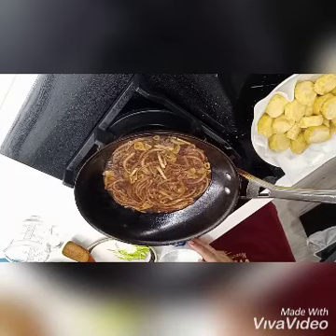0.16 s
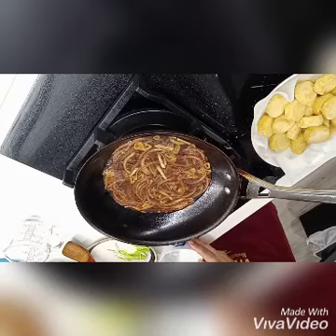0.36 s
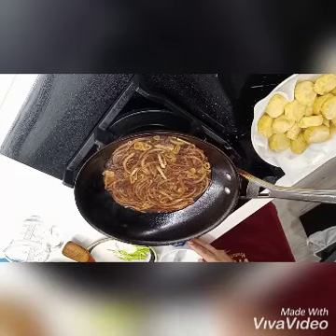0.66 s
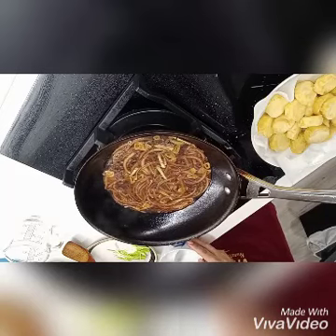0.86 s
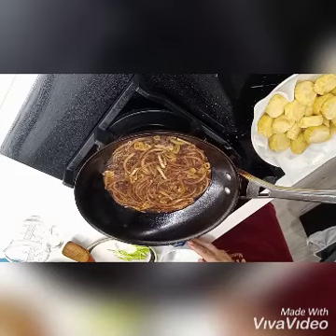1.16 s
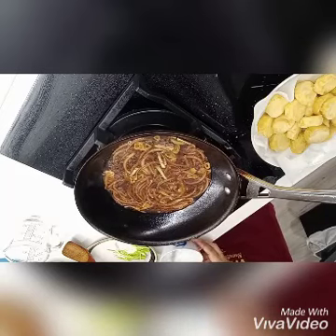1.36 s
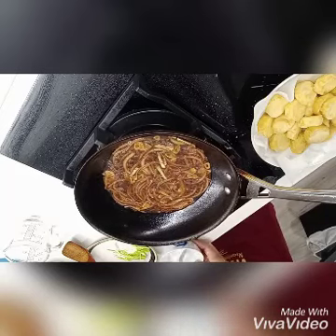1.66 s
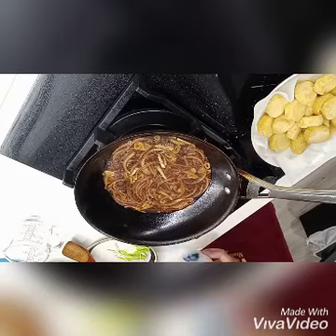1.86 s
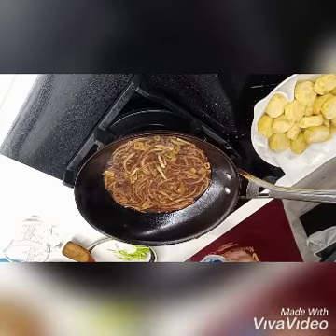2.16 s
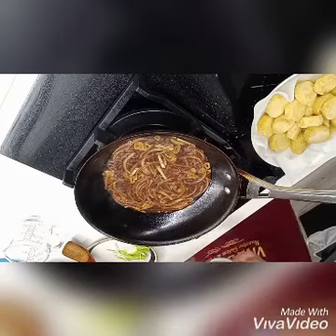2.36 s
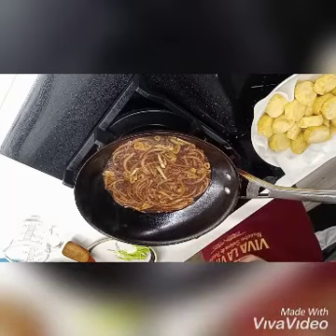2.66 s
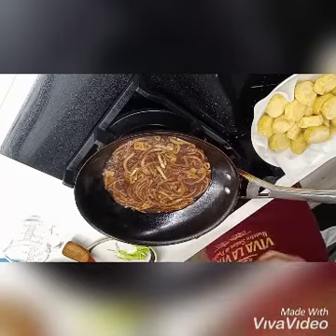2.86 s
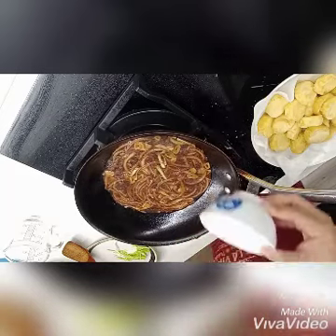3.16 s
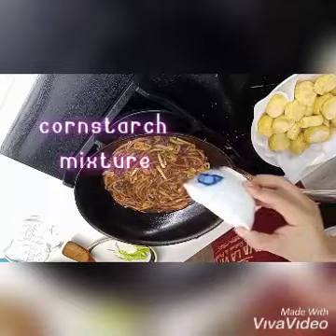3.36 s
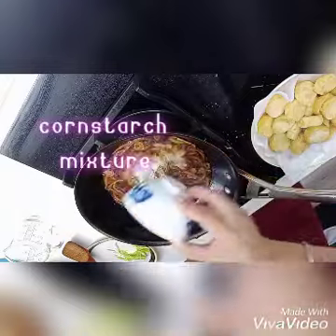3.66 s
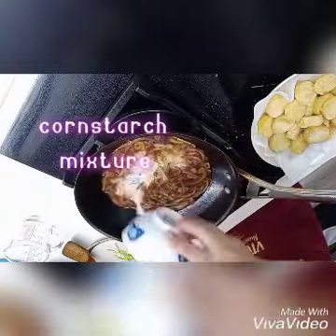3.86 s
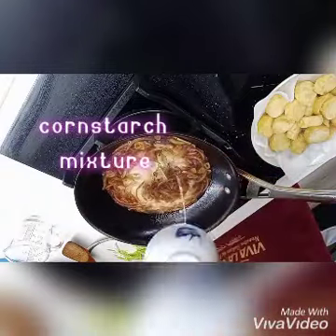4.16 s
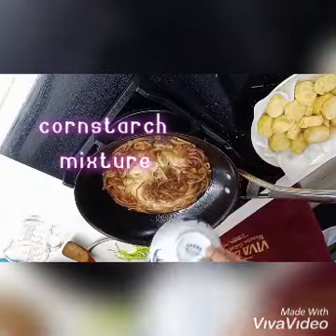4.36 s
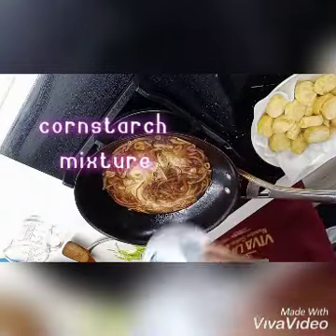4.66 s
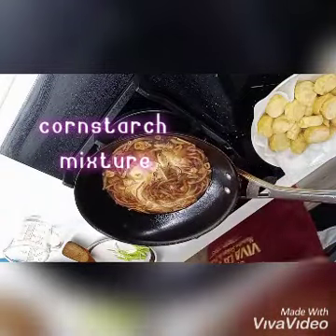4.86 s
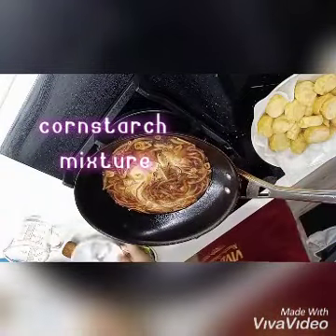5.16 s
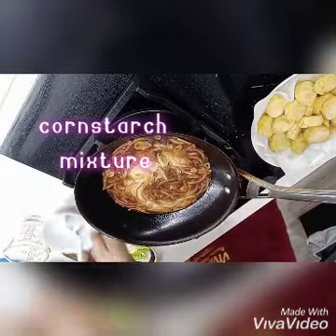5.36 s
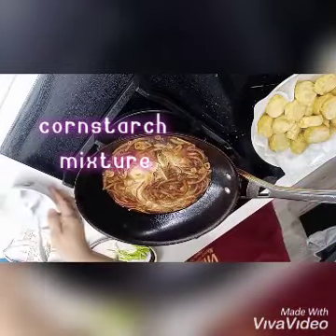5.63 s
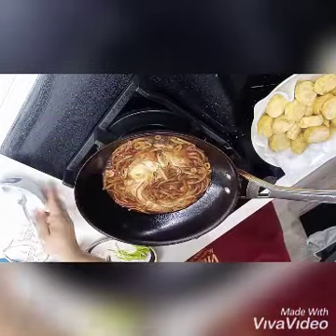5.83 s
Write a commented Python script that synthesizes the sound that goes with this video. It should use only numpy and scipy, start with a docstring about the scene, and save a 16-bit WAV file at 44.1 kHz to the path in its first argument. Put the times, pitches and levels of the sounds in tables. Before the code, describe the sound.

Steady stirring, about five turns a second, grinds and squeaks softly in a small bowl over quiet hum, hiss and fine sizzle. It stops, and a short, thin patter of liquid lands in sauce with tiny plips. The simmer fades. Later come hard, ringing spoon knocks, then a loud cluster of china chimes and counter thuds, with a short room reverberation and a close single microphone.

```python
"""A spoon rubs round a small china bowl of thin starch water, as random slips excite resonances, beside a
simmering pan of noise and pops, under low hum, airy hiss and a faint high whine of narrow-band noise.
Soft bubbles glide upward in pitch; then the liquid is tipped into the sauce as a patter of random droplets,
and the simmer sinks. Last the spoon clinks and the bowl clatters among the dishes on the counter of a small
kitchen: decaying modes, cracks and thuds, each with a short reverberant tail."""
import sys
import numpy as np
from scipy import signal
from scipy.fft import rfft, irfft, next_fast_len
from scipy.io import wavfile
from scipy.ndimage import uniform_filter1d, map_coordinates

SR = 44100
rng = np.random.default_rng(int(sys.argv[2]) if len(sys.argv) > 2 else 0)


def file_out(sig):
    """Save sig as 16-bit WAV at sys.argv[1]."""
    # one column per channel
    cols = np.atleast_2d(sig).T
    # limit, then scale
    lim = np.clip(cols, -1, 1)
    pcm = np.round(lim * 32767).astype(np.int16)
    wavfile.write(sys.argv[1], SR, pcm)


N = 264370  # length in samples

# Spectra of room hum and airy hiss, relative: frequency_hz, level_db
HUM_SPECTRUM = [(20, -17), (50, -19), (75, 3), (100, -2), (120, 4.5), (165, -3), (210, 0), (250, -14.5),
                (310, -7), (450, -15), (700, -15), (1000, -21.5), (1500, -52)]
AIR_SPECTRUM = [(500, -3), (900, -1.5), (1700, 6.5), (2300, 3.5), (3000, 3.5), (4400, -2), (5600, 1),
                (6300, -10.5), (7500, -6.5), (12000, -22)]
# Spectra of the simmer's fizz and of its bubble bursts, relative: frequency_hz, level_db
FIZZ_SPECTRUM = [(3000, -30), (5600, -25), (6350, -19), (6900, -1), (8000, -11.5), (8900, 5), (11000, 1.5),
                 (12500, -6.5), (13900, -1.5), (14700, -7), (15400, 6.5), (16000, -17)]
SPIT_SPECTRUM = [(4000, -11), (6000, -2.5), (10000, 4), (12000, 7), (14000, -20)]
# Centre of the whine: time_s, pitch_hz
WHINE_PITCH = [(0, 1293), (2.2, 1295), (3.4, 1310), (4.2, 1289), (4.8, 1281), (6, 1273)]
# Strength of the whine: time_s, level_db
WHINE_LEVEL = [(0, -53.4), (1.5, -53), (3.8, -54), (4.45, -62), (4.62, -59), (4.7, -51), (4.8, -58.5),
               (6, -60.5)]
# Mean levels; the cold liquid quenches the simmer, and the airy hiss sinks with it
HUM_DB, SIMMER_DB, AIR_DB = -57.5, -60, -62
QUENCH_AT_S, QUENCH_TIME_CONSTANT_S = 3.55, 0.97
SIMMER_QUENCH_DB, AIR_QUENCH_DB = -10.5, -2

# Reverberation of the kitchen: frequency_hz, t60_s
KITCHEN_DECAY = [(120, 0.65), (500, 0.25), (2000, 0.32), (6000, 0.29), (14000, 0.32)]

# Air pockets closing in the liquid, and last drips: start_s, initial pitch_hz, level_db
GLUGS = [(1.13, 927, -36), (1.166, 928, -44), (1.361, 870, -49), (1.539, 927, -44), (1.933, 2650, -40),
         (2.066, 2470, -43), (3.42, 2160, -46), (3.673, 1040, -52), (4.247, 3230, -39.5),
         (4.252, 3610, -45)]
# Gushes leaving the bowl: start_s, length_s, peak level_db
GUSHES = [(3.29, .26, -63.5), (3.856, 0.16, -67.5)]
# Spectrum of the stream on the sauce, relative: frequency_hz, level_db
SPLASH_SPECTRUM = [(60, -60), (300, -21), (1000, -24), (2200, 25), (3200, -27), (6000, 0), (12000, -24)]

# Resonances of the rubbed bowl and spoon, before the grip shifts them: centre_hz,
# width_hz of each of two cascaded filters, relative level_db
GRIND_RESONANCES = [(497, 125, -11.5), (1033, 184, -4), (1278, 180, 3), (1924, 146, -1), (2115, 200, 4.5),
                    (2880, 220, -17), (3413, 93, -4)]
SQUEAK_RESONANCES = [(2350, 110, -6), (4690, 100, 2), (6740, 170, -1), (8370, 200, -4), (9340, 200, -9),
                     (11290, 280, -9)]
# The rub sinks as the spoon slows: time_s, pitch_ratio
GRIP = [(0, 1.013), (1.1, 0.98), (1.55, 1.006), (1.7, .978), (2.2, 0.97)]
# Pressure on the bottom of the bowl: time_s, grind level_db
BOTTOM_PRESS = [(0, -55.5), (.2, -46), (.4, -48.5), (1.38, -47), (1.57, -48.5), (1.77, -59), (1.96, -47),
                (2.16, -51.5)]
# Pressure on the wall of the bowl: time_s, squeak level_db
WALL_PRESS = [(.1, -59.5), (1.07, -55), (1.46, -52.5), (1.66, -47.5), (1.85, -57), (2.05, -59.5)]
# The spoon digs in or slides for a moment: start_s, length_s, grind level_db
DIGS = [(0.208, 0.019, -40.5), (1.004, 0.017, -52), (1.967, 0.06, -48), (2.167, 0.023, -49),
        (2.197, 0.016, -40), (5.025, 0.031, -51), (5.134, 0.033, -51.5)]
# The spoon circles evenly: each turn grinds over the bottom, then squeaks along the wall
FIRST_TURN_S, TURN_S, STOP_S = .018, .192, 2.25
GRIND_S, SQUEAK_AFTER_S, SQUEAK_S = 0.0715, .072, 0.0803
SQUEAK_LAG_PER_S = 0.013  # the squeak comes a little later in each turn
SQUEAK_IN_GRIND_DB, GRIND_IN_SQUEAK_DB = -11.5, -3.5
PRESS_RISE_S, PRESS_FALL_S, DIG_RISE_S = 0.011, 0.0079, 0.0018

# Ringing modes of spoon, china and a dull knock near 1.26 kHz, before each contact scales their decay:
# pitch_hz, relative level_db, t60_s
SPOON_MODES = [(1868, -7, .22), (2830, -12, .12), (4124, -3, .3), (4160, -5, .24), (4215, -6, .26),
               (4478, -2, .13), (6950, -12, .2), (7090, -11, .16), (7187, -6, .22), (7268, 0, .17),
               (7335, -7, .18), (8371, -26, .19), (9432, -21, .23), (11030, -20, .2), (15450, -29, .15)]
CHINA_MODES = [(2247, -5, .25), (2385, -3.5, .68), (3095, -10, .13), (3848, -8, .22), (4490, -5, .2),
               (5437, 0, .2), (5777, -1, .35), (6564, -5, .17), (6777, 1, .14), (8420, -4, .15),
               (9442, -5, .29), (10256, -7, .14), (11400, -12, .18), (11520, -15, .16), (12580, -17, .13),
               (14650, -28, .25), (15080, -28, .2)]
KNOCK_MODES = [(1135, -19, 0.053), (1160, -18, 0.12), (1255.7, 3, 0.15), (1312, 3.5, 0.12)]
# Spectrum of the contact noise, relative: frequency_hz, level_db
CRACK_SPECTRUM = [(40, -58), (200, -20.5), (800, -17.5), (1300, 2), (1900, 5.5), (2800, 1.5), (3500, -0.5),
                  (4300, 1), (5500, -4), (6300, -8), (7200, -12.5), (8200, -20.5), (11500, -26.5),
                  (13500, -53), (15500, -45)]
# Resonances of the counter: centre_hz, width_hz of each of two cascaded filters, relative level_db
COUNTER_RESONANCES = [(126, 18.4, 3), (175.3, 77, 3), (297, 116, -0.5), (479, 110, 2), (693, 87, 0.5),
                      (950, 170, -2)]
# Spoon on bowl: start_s, crack_db, low_ring_db, high_ring_db, sustain (factor on t60)
CLINKS = [(0.5433, -32, -27, -36, 0.15), (4.247, -49, -57, -60, 0.3), (4.8629, -23, -25.5, -18.5, 0.5),
          (4.8935, -25, -25, -26.5, 0.73), (5.012, -48, -45, -55, 0.55), (5.04, -41, -46, -48.5, 0.38),
          (5.1397, -52.5, -58.5, -60, 0.85), (5.1916, -52, -59.5, -59.5, .75),
          (5.59, -21.5, -27, -18, 0.65), (5.6991, -22, -30, -21, 0.62), (5.7214, -20, -36, -25.5, 1)]
# Bowl on other china: start_s, crack_db, ring_db, brightness_hz, sustain (factor on t60)
CHIMES = [(5.5813, -18, -18, 12000, 0.87), (5.601, -28, -25, 11000, 1), (5.6209, -35, -18.5, 9000, 1),
          (5.6448, -28, -25, 10100, 0.64), (5.7223, -33, -26.5, 10000, .9)]
# Foot of the bowl on the counter: start_s, knock_db, crack_db, thud_db, rattle_s
BUMPS = [(0.549, -32, -40, -34, 0.054), (5.4936, -58, -21, -23.5, .005), (5.5177, -24.5, -36, -22.5, .005),
         (5.559, -48, -29.5, -32, .005), (5.582, -24.5, -29, -25, 0.041),
         (5.6883, -19.5, -24.5, -23, 0.022), (5.7088, -18.5, -30.5, -28, 0.069),
         (5.7552, -24, -33, -32, 0.0055), (5.7712, -14, -22, -25, 0.041), (5.8112, -35, -37, -38, .005)]
REBOUND_S, REBOUND_DB = .0072, -9  # the spoon bounces once
CLINK_KNOCK_DB = -5.5  # beside the low ring
KNOCK_SUSTAIN = 0.51  # factor on t60
CRACK_T60_S, THUD_T60_S, THUD_RISE_S = 0.042, 0.071, 0.0037
# First gap, ratio of each gap to the one before, loss over the rattle's length
RATTLE_GAP_S, RATTLE_SLOWS, RATTLE_LOSS_DB = .009, 1.25, 19.5

TOP_HZ = 15700  # band limit of the microphone


def amp(db):
    """Logarithmic level: decibels to linear gain."""
    return 10 ** (np.asarray(db) / 20)


def unit(x):
    """Normalisation: scale to rms 1."""
    return x / np.sqrt(np.mean(x ** 2) + 1e-20)


def along(points, hz):
    """Logarithmic frequency scale: read (frequency, value) points at hz."""
    f, v = np.transpose(points)
    return np.interp(np.log(hz + 1), np.log(f + 1), v)


def curve(rows):
    """Linear interpolation: (time, value) rows to one value per sample."""
    s, value = np.transpose(rows)
    return np.interp(np.arange(N) / SR, s, value)


def wobble(rate):
    """Slow random modulation: a smooth curve through rate random knots a second."""
    knots = rng.standard_normal(int(N * rate / SR) + 4)
    return map_coordinates(knots, [np.arange(N) * rate / SR])


def filtered(x, response):
    """Linear filtering: multiply the transform of x by a response of frequency."""
    m = next_fast_len(len(x) + 4096)
    return irfft(rfft(x, m) * response(np.fft.rfftfreq(m, 1 / SR)), m)[:len(x)]


def coloured(x, spectrum):
    """Spectral shaping: weight x by a spectrum, at rms 1."""
    return unit(filtered(x, lambda hz: amp(along(spectrum, hz))))


def resonate(x, modes, ratio=1):
    """Resonance: sum squared band-pass responses, whose skirts are steep, at rms 1."""
    def response(f):
        total = 0
        for centre, width, db in modes:
            band = 1j * f * width / ((centre * ratio) ** 2 - f * f + 1j * f * width)
            total = total + amp(db) * band ** 2
        return total
    return unit(filtered(x, response))


def grains(size, rate, spread_db):
    """Random excitation: impulses of uneven strength and sign, about rate a second, at rms 1."""
    hit = rng.random(size) < rate / SR
    sign = np.sign(rng.standard_normal(size))
    strength = amp(spread_db * np.clip(rng.standard_normal(size), -2, 2))
    return unit(hit * sign * strength)


def ring(modes, t, sustain, scatter_db):
    """Modal decay: struck modes of random strength and phase start near rms 1, damped by hand or counter."""
    hz, db, t60 = np.transpose(modes)[:, :, None]
    hz = hz * (1 + .0006 * rng.standard_normal(hz.shape))
    gain = amp(db + scatter_db * rng.standard_normal(db.shape))
    decay = amp(-60 * t / (t60 * sustain))
    waves = np.sin(2 * np.pi * (hz * t + rng.random(hz.shape))) * decay
    onset = 1 - np.exp(-t / .0005)
    return (gain * waves).sum(0) * np.sqrt(2 / np.sum(gain ** 2)) * onset


def add(track, s, sound):
    """Superposition: mix a sound into a track at s seconds."""
    part = track[max(round(s * SR), 0):][:len(sound)]
    part += sound[:len(part)]


def in_kitchen(x, wet_db):
    """Reverberation: add x convolved with decaying noise, whose decay time depends on frequency."""
    hz, t, z = signal.stft(rng.standard_normal(SR // 2), SR, nperseg=256)
    decay = amp(-60 * t / along(KITCHEN_DECAY, hz)[:, None])
    tail = signal.istft(z * decay, SR, nperseg=256)[1]
    tail *= 1 - np.exp(-np.arange(len(tail)) / SR / 0.0024)
    return x + amp(wet_db) * signal.fftconvolve(x, tail / np.linalg.norm(tail))[:len(x)]


def quench():
    """Exponential approach: cooling grows from 0 toward 1 once the cold liquid is in."""
    elapsed = np.maximum(np.arange(N) / SR - QUENCH_AT_S, 0)
    return 1 - np.exp(-elapsed / QUENCH_TIME_CONSTANT_S)


def room_hum():
    """Coloured noise: a low hum whose level wavers at random."""
    return amp(HUM_DB + 1.3 * wobble(7)) * coloured(rng.standard_normal(N), HUM_SPECTRUM)


def patchy(x, depth_db):
    """Time-frequency modulation: smoothed random patches of gain on x."""
    z = signal.stft(x, nperseg=256)[2]
    field = uniform_filter1d(rng.standard_normal(z.shape), size=4, axis=0)
    field = uniform_filter1d(field, size=7, axis=1)
    return signal.istft(z * amp(depth_db * unit(field)), nperseg=256)[1][:len(x)]


def airy_hiss():
    """Coloured noise: patchy hiss that sinks with the quenched simmer."""
    level_db = AIR_DB + AIR_QUENCH_DB * quench() + 0.52 * wobble(3.3)
    return amp(level_db) * coloured(patchy(rng.standard_normal(N), depth_db=3.0), AIR_SPECTRUM)


def high_whine():
    """Quadrature modulation: two low-passed noises on a gliding carrier make a fuzzy tone."""
    def narrow():
        return filtered(rng.standard_normal(N), lambda hz: 1 / (1 + 1j * hz / 34) / (1 + 1j * hz / 180))
    phase = 2 * np.pi * np.cumsum(curve(WHINE_PITCH)) / SR
    tone = unit(narrow() * np.cos(phase) + narrow() * np.sin(phase))
    return amp(curve(WHINE_LEVEL)) * tone


def spits(rate, centre_hz, life):
    """Bubble bursts: puffs of resonant noise at random times, each at its own pitch, at rms 1."""
    out, t = np.zeros(N), np.arange(SR // 20) / SR
    count = int(rate * N / SR)
    times = rng.random(count) * N / SR
    variations = np.clip(rng.standard_normal((count, 2)), -1.8, 1.8)
    for s, (pitch, size) in zip(times, variations):
        hz = centre_hz * np.exp(.22 * pitch)
        puff = resonate(rng.standard_normal(len(t)), [(hz, 0.15 * hz, 0)])
        envelope = amp(3.5 * size - 60 * t / life) * (1 - np.exp(-t / .003))
        add(out, s, envelope * puff)
    return unit(out)


def simmering():
    """Bubble noise: fine fizz and sauce bubbles bursting, quenched by the cold liquid."""
    pops = grains(N, rate=900, spread_db=5)
    fizz = coloured(rng.standard_normal(N) + 1.07 * pops, FIZZ_SPECTRUM)
    bursts = coloured(spits(rate=150, centre_hz=8560, life=0.02), SPIT_SPECTRUM)
    level_db = SIMMER_DB + SIMMER_QUENCH_DB * quench() + 1.45 * wobble(7)
    return amp(level_db) * (fizz + amp(-2.5) * bursts)


def bubbles():
    """Bubble resonance: decaying sines rise in pitch, and those of higher pitch die sooner."""
    out, t = np.zeros(N), np.arange(SR // 6) / SR
    for s, hz, db in GLUGS:
        life = 130 / hz
        envelope = amp(db - 60 * t / life) * (1 - np.exp(-20 * t / life))
        add(out, s, envelope * np.sin(2 * np.pi * hz * t * (1 + 0.041 * t / life)))
    return out


def pouring():
    """Random impacts: droplets of the thin stream patter on the sauce in gushes."""
    flow = np.zeros(N)
    for s, length, db in GUSHES:
        add(flow, s, amp(db) * np.hanning(int(length * SR)))
    return flow * coloured(grains(N, rate=900, spread_db=3), SPLASH_SPECTRUM)


def stroke(s, length, rise, grind_db, squeak_db):
    """Stick-slip friction: tiny catches on the glaze excite resonances of bowl and spoon."""
    t = np.arange(SR // 4) / SR
    ratio = np.interp(s, *np.transpose(GRIP)) * (1 + .008 * rng.standard_normal())
    press = (1 - np.exp(-t / rise)) / (1 + np.exp((t - length) / PRESS_FALL_S))
    slips = grains(len(t), rate=1100, spread_db=6.5)
    grind = amp(grind_db) * resonate(slips, GRIND_RESONANCES, ratio)
    squeak = amp(squeak_db) * resonate(slips, SQUEAK_RESONANCES, ratio)
    # the pitch sags a little within a stroke as the spoon dips deeper
    sagging = t * (1 + .014 * (1 - t / length))
    return press * map_coordinates(grind + squeak, [sagging * SR])


def stirring():
    """Periodic friction: turns of grind and squeak follow the hand's pressure, with harder digs."""
    out, turns = np.zeros(N), np.arange(FIRST_TURN_S, STOP_S, TURN_S)
    for s in turns:
        db = np.interp(s, *np.transpose(BOTTOM_PRESS))
        add(out, s, stroke(s, GRIND_S, PRESS_RISE_S, db, db + SQUEAK_IN_GRIND_DB))
    for s in turns[:-1] * (1 + SQUEAK_LAG_PER_S) + SQUEAK_AFTER_S:
        db = np.interp(s, *np.transpose(WALL_PRESS))
        add(out, s, stroke(s, SQUEAK_S, PRESS_RISE_S, db + GRIND_IN_SQUEAK_DB, db))
    for s, length, db in DIGS:
        add(out, s, stroke(s, length, DIG_RISE_S, db, squeak_db=-67))
    return in_kitchen(out, wet_db=-4)


def crack(t):
    """Contact noise: a brief decaying burst as two hard things meet."""
    return amp(-60 * t / CRACK_T60_S) * coloured(rng.standard_normal(len(t)), CRACK_SPECTRUM)


def spoon_on_bowl():
    """Modal excitation: soft contact favours low modes, hard contact wakes high ones; one rebound follows."""
    out, t = np.zeros(N), np.arange(SR // 2) / SR
    for s, crack_db, low_db, high_db, sustain in CLINKS:
        for delay, loss_db in [(0, 0), (REBOUND_S, REBOUND_DB)]:
            low = ring(SPOON_MODES[:6], t, sustain, scatter_db=2)
            high = ring(SPOON_MODES[6:], t, sustain, scatter_db=2)
            knock_ring = amp(CLINK_KNOCK_DB) * ring(KNOCK_MODES, t, KNOCK_SUSTAIN, scatter_db=4)
            clink = amp(crack_db) * crack(t) + amp(low_db) * (low + knock_ring) + amp(high_db) * high
            add(out, s + delay, amp(loss_db) * in_kitchen(clink, wet_db=-3.5))
    return out


def bowl_on_china():
    """Impact spectrum: a crack and a long modal ring, duller for a softer touch."""
    out, t = np.zeros(N), np.arange(SR * 3 // 5) / SR
    for s, crack_db, ring_db, bright_hz, sustain in CHIMES:
        modes = [(hz, db - 10 * np.log10(1 + (hz / bright_hz) ** 4), t60) for hz, db, t60 in CHINA_MODES]
        chime = amp(ring_db) * ring(modes, t, sustain, scatter_db=2.5) + amp(crack_db) * crack(t)
        add(out, s, in_kitchen(chime, wet_db=-5.5))
    return out


def rattle(length, count):
    """Repeated impact: (delay s, gain) of a bump and ever weaker contacts at widening gaps."""
    gaps = RATTLE_GAP_S * RATTLE_SLOWS ** np.arange(count)
    delays = np.cumsum(gaps) - gaps
    return zip(delays, amp(-RATTLE_LOSS_DB * delays / length))


def counter_thud(t):
    """Resonant response: the counter filters noise that rises fast and decays."""
    envelope = amp(-60 * t / THUD_T60_S) * (1 - np.exp(-t / THUD_RISE_S))
    return envelope * resonate(rng.standard_normal(len(t)), COUNTER_RESONANCES)


def bowl_on_counter():
    """Coupled impact: each contact of the foot cracks, sets off a dull knock near 1.26 kHz and thuds in the
    counter."""
    out, t = np.zeros(N), np.arange(SR // 2) / SR
    for s, knock_db, crack_db, thud_db, length in BUMPS:
        noise, knock = np.zeros((2, len(t)))
        for delay, gain in rattle(length, count=5):
            contact = amp(crack_db) * crack(t) + amp(thud_db) * counter_thud(t)
            add(noise, delay, gain * contact)
            knock_ring = ring(KNOCK_MODES, t, KNOCK_SUSTAIN, scatter_db=4)
            add(knock, delay, gain * amp(knock_db) * knock_ring)
        add(out, s, in_kitchen(noise, wet_db=-3) + in_kitchen(knock, wet_db=-7))
    return out


def scene():
    """Superposition: background, liquid, stirring and crockery in one channel."""
    background = room_hum() + airy_hiss() + high_whine() + simmering()
    liquid = in_kitchen(bubbles() + pouring(), wet_db=-3.5)
    crockery = spoon_on_bowl() + bowl_on_china() + bowl_on_counter()
    return (background + liquid + stirring() + crockery)[None]


def record(dry):
    """Saturation and band limiting: the microphone rounds loud peaks, sheds deep bass and cuts the top."""
    soft = dry[0] / (1 + np.abs(dry[0] / .38) ** 4) ** (1 / 4)
    return filtered(soft, lambda hz: (hz < TOP_HZ) * 1j * hz / (30 + 1j * hz))[None]


dry = scene()
out = record(dry)
file_out(out)
```